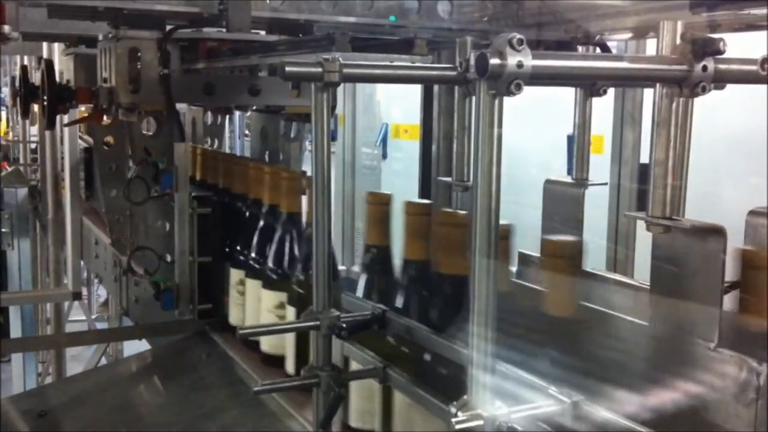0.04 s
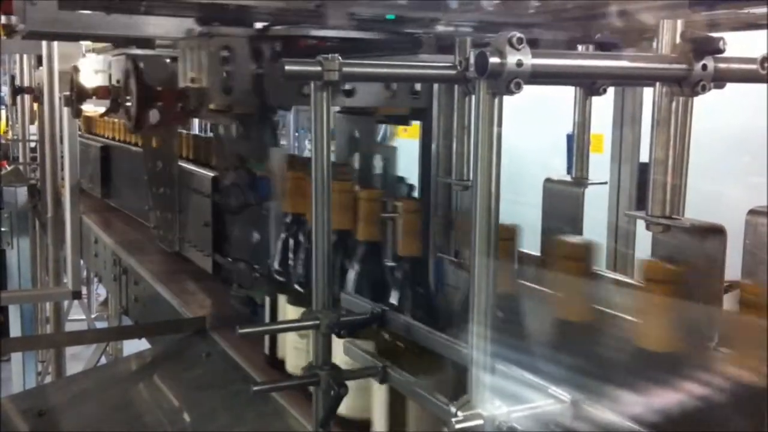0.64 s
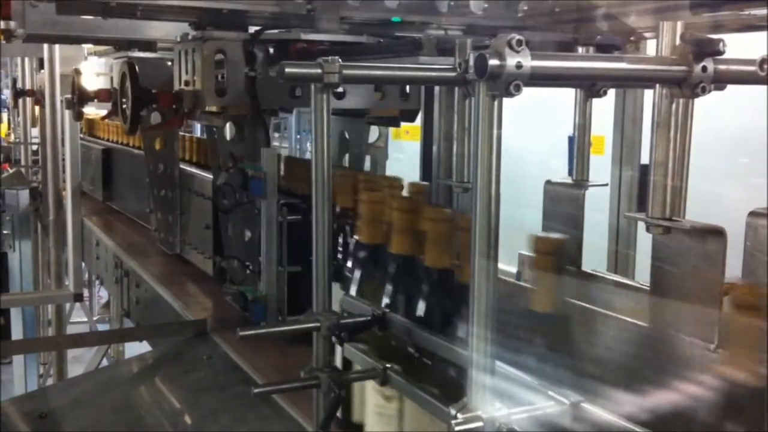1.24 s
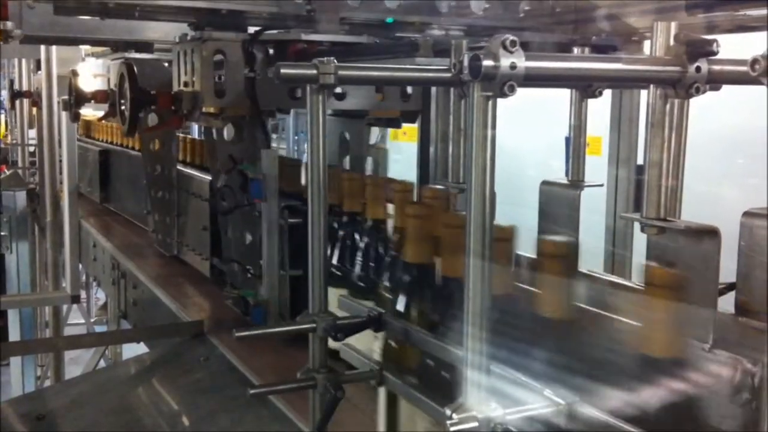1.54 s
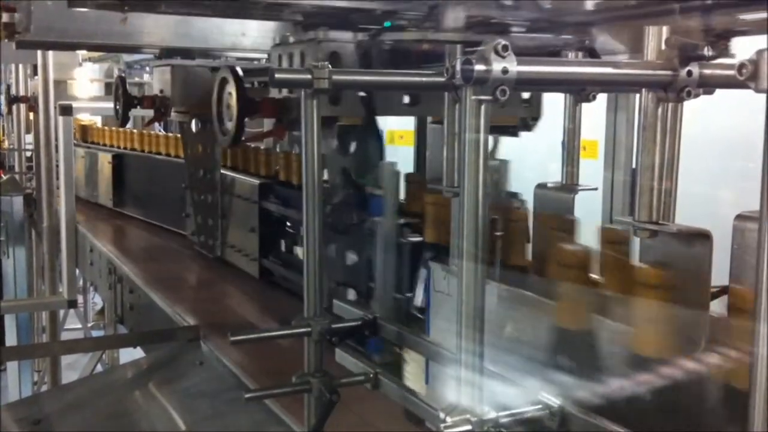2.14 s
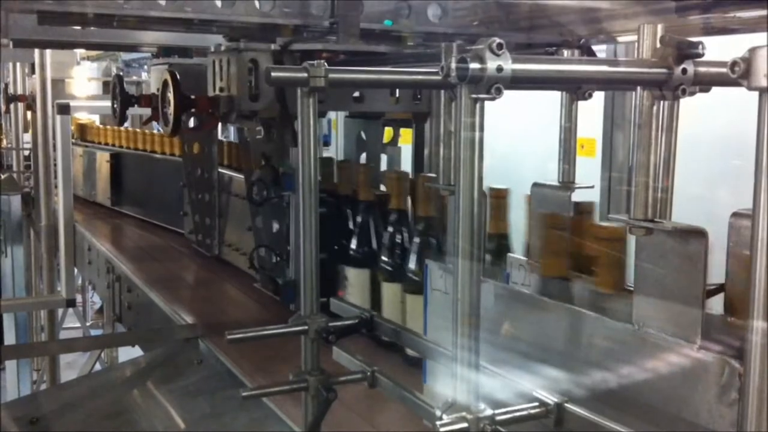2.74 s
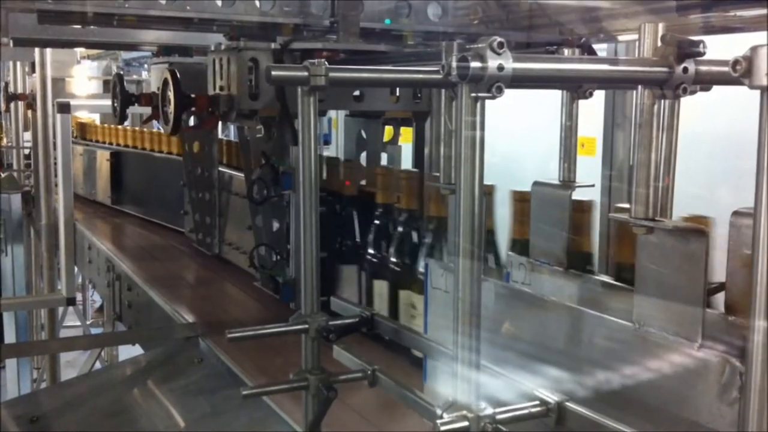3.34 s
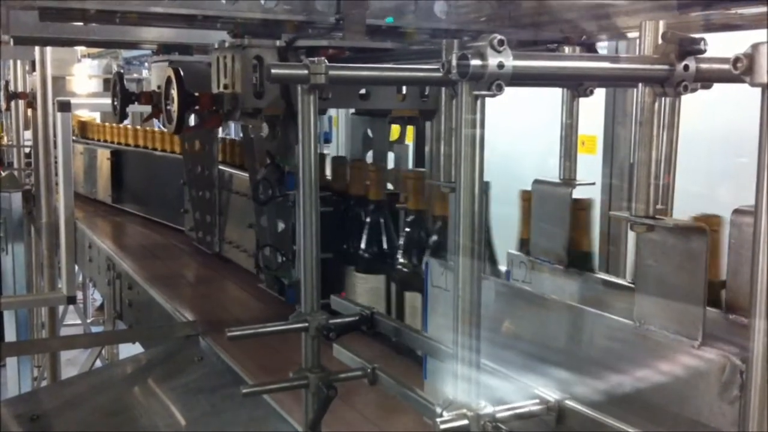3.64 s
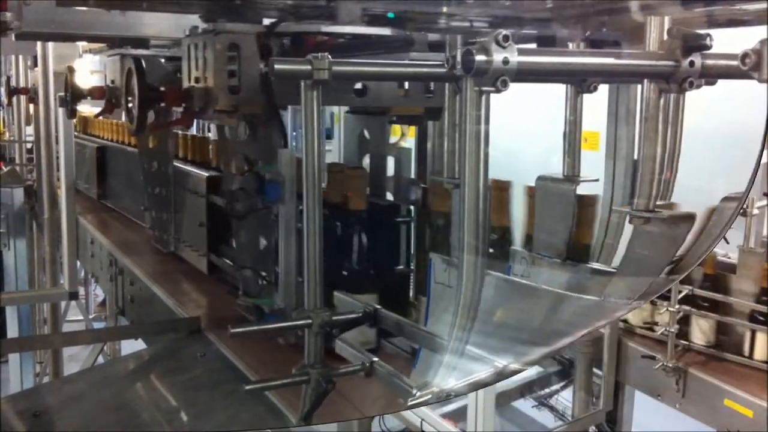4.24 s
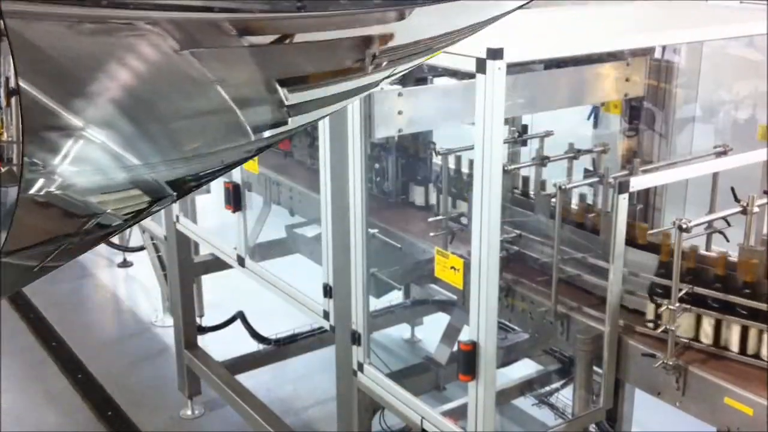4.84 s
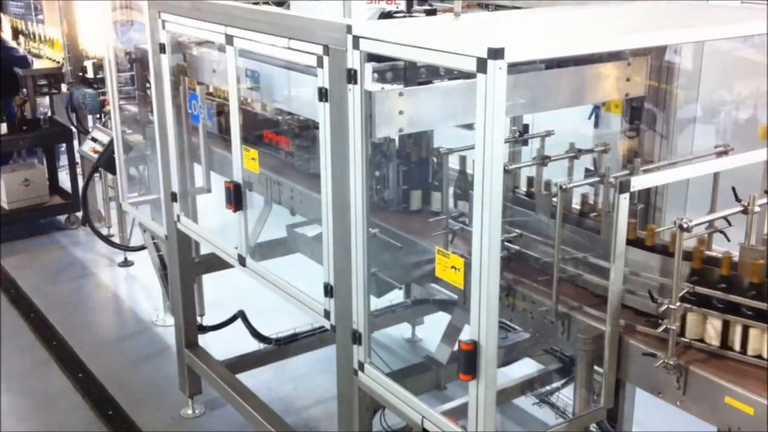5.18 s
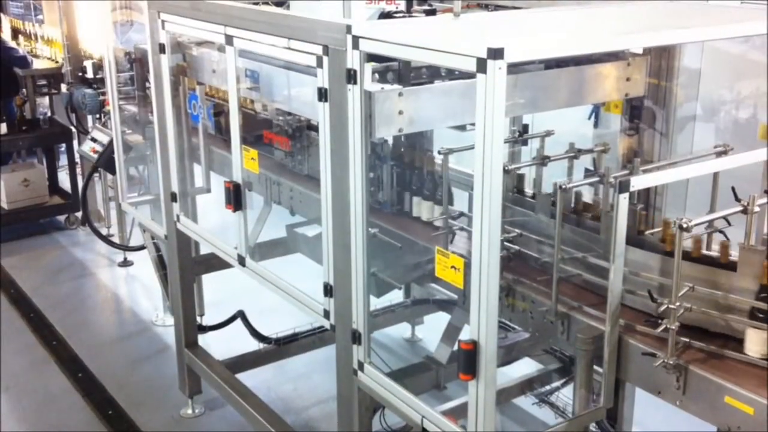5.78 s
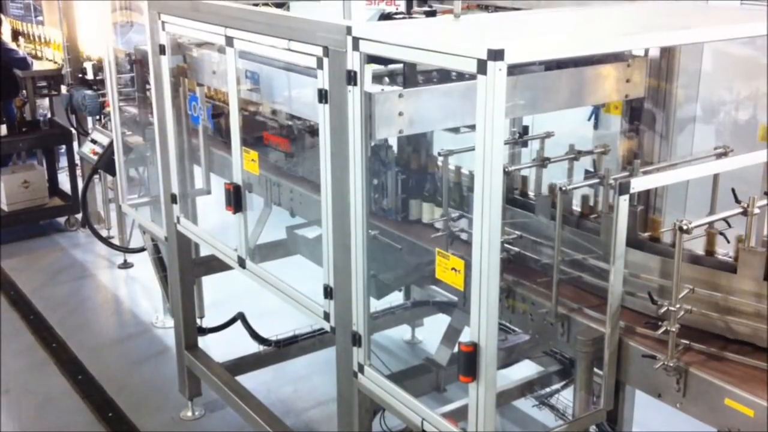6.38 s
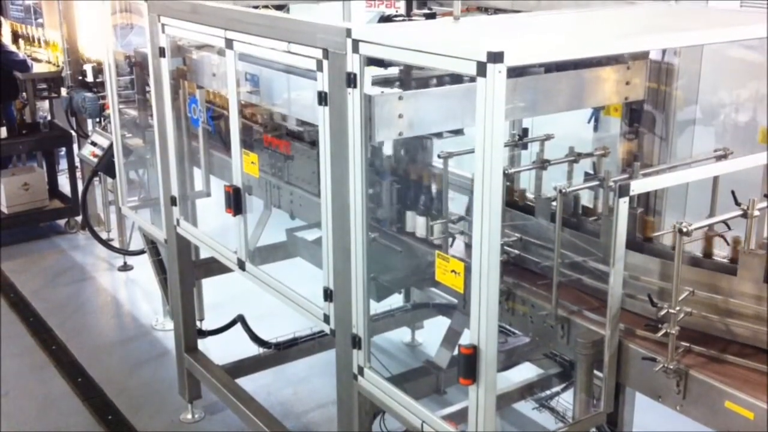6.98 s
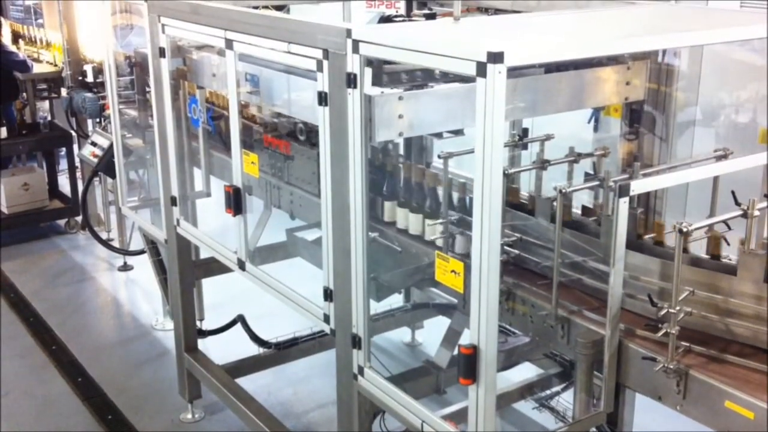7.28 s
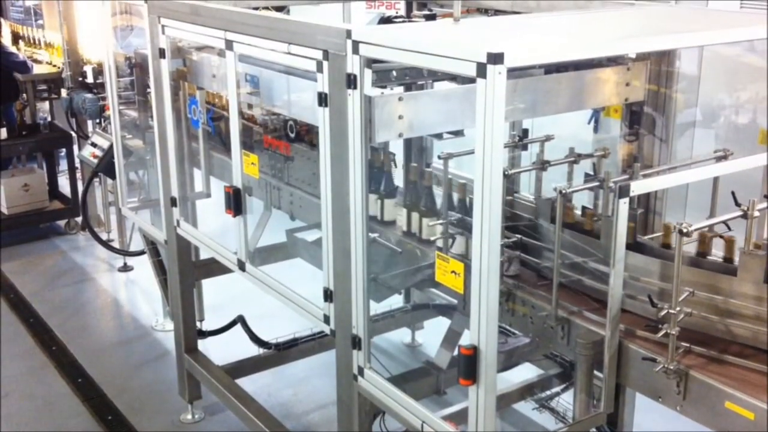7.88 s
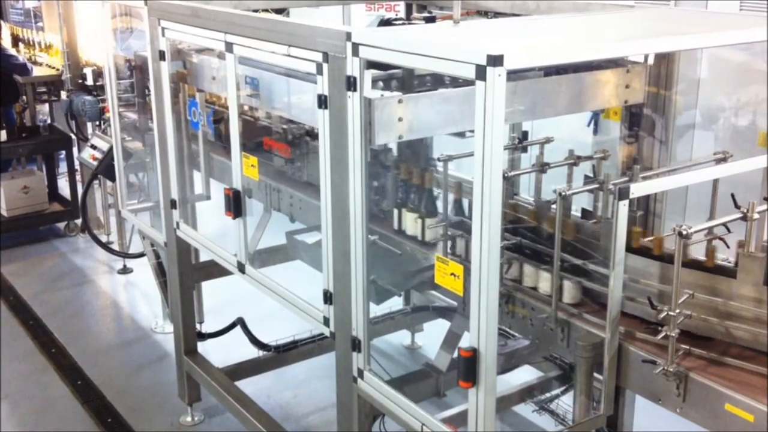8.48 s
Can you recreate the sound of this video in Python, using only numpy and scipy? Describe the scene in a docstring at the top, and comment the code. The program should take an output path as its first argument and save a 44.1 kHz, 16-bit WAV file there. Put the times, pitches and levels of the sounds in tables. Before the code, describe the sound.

A factory bottling line runs continuously in mono. At first the microphone is inside the machine guard, with a rattling conveyor roar, motor hum, lightly knocking glass bottles and whistling, hissing air, all gradually easing. The sound then switches abruptly to outside the machine, where the roar is fuller again and the whistle keeps flaring over it. A second, higher whistle and a faint thin whine appear, while bottles keep jostling.

```python
"""A bottling line in a factory hall, in mono. We start inside the guard of the bottle divider: conveyor
chains roar over humming motors, bottles jostle and knock, and compressed air hisses and whistles in
narrow resonances. Roar and air slowly recede. At 3.8 s a hard cut puts us beside the machine: the roar
is back up, the whistle holds and swells, and a higher whistle and thin motor controller tones join in.
The hiss creeps up to the end. Throughout, the loudest peaks are softly rounded."""
import sys
import numpy as np
from scipy import signal
from scipy.fft import rfft, irfft
from scipy.io import wavfile

SR = 44100
rng = np.random.default_rng(int(sys.argv[2]) if len(sys.argv) > 2 else 0)


def generate_wav(sig):
    """Save sig (samples, or channels by samples) to the path in sys.argv[1] as 16-bit PCM at SR."""
    pcm = np.round(np.clip(np.atleast_2d(sig).T, -1, 1) * 32767).astype(np.int16)
    wavfile.write(sys.argv[1], SR, pcm)


N = 380141
CUT_S = 3.808

# Tone of the machine frame's rumble. Each row: frequency in Hz, relative level in dB.
FRAME_SPECTRUM = [(35, -40), (60, -46), (90, -13.5), (125, -4.5), (185, 2.5), (250, 2), (320, -5.5),
                  (600, -30)]
# The frame rumbles harder for a while. Each row: centre in seconds, length in seconds, lift in dB.
FRAME_SHUDDERS = [(1.95, .4, 0.5), (2.95, 0.33, 4), (4.25, 0.32, 3), (7.5, 1.5, 2)]
# Tone of the finest air spray. Each row: frequency in Hz, relative level in dB.
SPRAY_SPECTRUM = [(8000, -11), (11500, 0), (13700, 1), (15700, -3)]
# Brief puffs of extra air. Each row: centre in seconds, length in seconds, lift in dB.
AIR_PUFFS = [(1.74, .25, 1.5), (3.95, 0.18, 1.3), (5.25, 0.17, 1.5), (6.26, .08, 3), (7.5, 0.11, 2.4),
             (7.82, 0.21, 1.2)]
# The main whistle briefly swells louder. Each row: centre in seconds, length in seconds, lift in dB.
WHISTLE_SWELLS = [(.15, .25, 2.5), (3.26, .12, 6), (4.24, .35, 3.5), (4.63, 0.05, 6), (5.85, 0.027, 4),
                  (6.43, 0.023, 9.5), (8.24, 0.032, 3.5)]


def undb(db):
    """Decibels to gain."""
    return 10 ** (np.asarray(db) / 20)


def unit(x):
    """Scale to rms 1."""
    return x / np.sqrt(np.mean(x ** 2))


def fader(points):
    """A gain ride through points of time in seconds and level in dB."""
    seconds, db = np.transpose(points)
    return undb(np.interp(np.arange(N) / SR, seconds, db))


def drift(rate):
    """Smooth random motion with rms 1, changing about rate times a second."""
    f = np.arange(N // 2 + 1) * SR / N
    return unit(irfft(rfft(rng.standard_normal(N)) / (1 + (f / rate) ** 4), N))


def waver(spread_db, rate):
    """Gain that wanders at random around 1."""
    return undb(spread_db * drift(rate))


def swells(table):
    """Gain with a bell-shaped lift for each row; the length is the width at half the lift in dB."""
    t = np.arange(N) / SR
    return undb(sum(db * .5 ** ((2 * (t - centre) / length) ** 2) for centre, length, db in table))


def equalise(x, spectrum):
    """Shape x with an EQ curve of points in Hz and dB, then scale to rms 1."""
    hz, db = np.transpose(spectrum)
    f = np.arange(1, N // 2 + 2) * SR / N
    return unit(irfft(rfft(x) * undb(np.interp(np.log(f), np.log(hz), db)), N))


def resonances(modes, skirt):
    """Noise rings narrow resonances; a second pole, skirt times wider, steepens their sides."""
    f = np.arange(1, N // 2 + 2) * SR / N
    out = 0
    for hz, width, db in modes:
        detune = (f - hz) / (width / 2)
        ring = irfft(rfft(rng.standard_normal(N)) / (1 + 1j * detune) / (1 + 1j * detune / skirt), N)
        out = out + undb(db) * unit(ring)
    return out


def controllers():
    """The motor controllers' thin switching tones, steady in pitch and drifting in level."""
    # Each row: frequency in Hz, level in dB.
    tones = [(5756, -47), (7228, -54), (8065, -56)]
    t = np.arange(N) / SR
    return sum(undb(db) * unit(np.sin(2 * np.pi * hz * t) * waver(2, rate=2)) for hz, db in tones)


def motors():
    """Motor and gear hum that wavers with the load: one mix for inside the guard, one for outside."""
    # Each row: frequency in Hz, level inside in dB relative to the roar, level outside in dB.
    drive_tones = [(118.8, -24.5, -48.5), (351, -17, -40), (790, -29, -41.5), (882, -30, -42)]
    inside, outside = 0, 0
    for hz, inside_db, outside_db in drive_tones:
        phase = 2 * np.pi * np.cumsum(hz * (1 + 0.00797 * drift(5.72))) / SR
        tone = unit(np.sin(phase) * waver(3.1, rate=8.2))
        inside += undb(inside_db) * tone
        outside += undb(outside_db) * tone
    return inside, outside


def bottles(jostle_db):
    """Bottles nudge each other all the time; a few knock harder against the guides."""
    # A full bottle on its steel guide. Each row: frequency in Hz, T60 in seconds, relative level in dB.
    modes = [(627.6, 0.26, -7.5), (726, .14, -15), (1110, 0.071, 0), (2790, 0.087, 4), (3640, 0.11, -25),
             (5320, .04, -13)]
    # Hard knocks in the divider. Each row: start in seconds, peak level in dB.
    knocks = [(.593, -20), (2.778, -22), (3.557, -24)]
    t = np.arange(SR // 4) / SR
    ring = sum(undb(db - 60 * t / t60) * np.sin(2 * np.pi * hz * t) for hz, t60, db in modes)
    # the ring carries no bass below 400 Hz
    ring = signal.sosfilt(signal.butter(2, 400, "high", fs=SR, output="sos"), ring)
    nudges = rng.random(N) < 14 / SR  # about 14 a second
    blows = undb(jostle_db) * nudges * rng.uniform(-1.1, 1, N)
    for start, db in knocks:
        blows[int(start * SR)] += undb(db)
    return signal.fftconvolve(blows, ring / np.abs(ring).max())[:N]


def clatter(per_second, spread_db):
    """Chain links strike at random, with uneven force."""
    hits = rng.random(N) < per_second / SR
    return unit(hits * rng.standard_normal(N) * undb(spread_db * rng.standard_normal(N)))


def conveyor(spectrum, rattle_db):
    """Near chain links rattle, smeared by the surrounding panels, over the wash of countless far ones."""
    t = np.arange(SR // 10) / SR
    panels = rng.standard_normal(len(t)) * undb(-60 * t / 0.041)  # T60 of 41 ms
    links = unit(signal.fftconvolve(clatter(per_second=500, spread_db=3.4), panels)[:N])
    return equalise(rng.standard_normal(N) + undb(rattle_db) * links, spectrum)


def air(spectrum, flutter_db):
    """The hiss of a turbulent jet whose strength flutters a little."""
    return equalise(rng.standard_normal(N), spectrum) * waver(flutter_db, rate=30)


def whistle(hz, width_hz, purity):
    """A jet locks onto a resonance: purity (0-1) is the share of wavering tone, the rest is breath."""
    pitch_hz = hz + 0.3996 * width_hz * drift(23.66)
    tone = unit(np.sin(2 * np.pi * np.cumsum(pitch_hz) / SR))
    breath = resonances([(hz, 1.47 * width_hz, 0)], skirt=2.8)
    return np.sqrt(purity) * tone + np.sqrt(1 - purity) * breath


def inside_guard(hum):
    """Close on the divider: chain roar, hollow bottles, bright air and the whistle, all receding."""
    # Tone of the chain roar and the air hiss. Each row: frequency in Hz, relative level in dB.
    roar_spectrum = [(100, -32), (280, -13), (380, -4), (560, -4.5), (760, -7), (920, -1.5), (1200, -2),
                     (1400, -4), (1650, -5), (2300, -12), (4000, -16.5), (8000, -28.5)]
    hiss_spectrum = [(1500, -22), (4000, -3.5), (6000, 1.5), (8000, 1), (10000, -0.5), (12200, -2),
                     (13000, -2), (15700, -22)]
    # Fader rides for the machinery and the fine spray. Each row: time in seconds, gain in dB.
    machine_ride = [(0.0, -21.5), (0.71, -22), (1.18, -25), (2.11, -25), (2.51, -28), (3.25, -29.5),
                    (3.37, -32), (3.76, -33)]
    spray_ride = [(0, -25.5), (1.0, -33.5), (2.14, -36), (2.65, -47), (3.0, -47), (3.6, -57)]
    # Hollow ring of passing bottles, and the weaker air resonances.
    # Each row: frequency in Hz, width in Hz, relative level in dB.
    hollow_modes = [(642, 35, -4.5), (762, 140, 1.5)]
    air_modes = [(2705, 62, -5.5), (2810, 110, -8), (3055, 64, -8.5), (3255, 89, -11), (3640, 91, -4),
                 (4450, 38, -16), (4700, 140, -13), (5385, 130, -11.5), (6660, 110, -16.5)]
    # Bottles crowd and ring louder. Each row: centre in seconds, length in seconds, lift in dB.
    crowding = [(.62, 0.15, 6), (1.02, 0.067, 5), (1.26, .05, 5)]

    roar = undb(1.92) * conveyor(roar_spectrum, rattle_db=-12.5)
    rumble = undb(-12.5) * conveyor(FRAME_SPECTRUM, rattle_db=-7)
    rumble *= waver(1.0, rate=13) * swells(FRAME_SHUDDERS)
    hollow = undb(-7.5) * resonances(hollow_modes, skirt=2.1)
    hollow *= waver(1.5, rate=8.6) * swells(crowding)
    machinery = fader(machine_ride) * (undb(0.5) * hum + roar + rumble + hollow)

    jet_gain = undb(-28.7 - 3.15 * np.arange(N) / SR) * swells(AIR_PUFFS)  # falls 3.15 dB a second
    main_whistle = undb(4.5) * whistle(hz=1803, width_hz=39.7, purity=0.47)
    main_whistle *= waver(1, rate=30) * swells(WHISTLE_SWELLS)
    rings = undb(2.5) * resonances(air_modes, skirt=6) * waver(1.35, rate=13)
    hiss = undb(0.3) * air(hiss_spectrum, flutter_db=0.57)
    spray = fader(spray_ride) * air(SPRAY_SPECTRUM, flutter_db=-1.3)
    return machinery + jet_gain * (main_whistle + rings + hiss) + spray


def beside_machine(hum):
    """Out in the hall: the whistle leads over roar and slowly growing hiss, with a softer top end."""
    # Tone of the chain roar and the air hiss. Each row: frequency in Hz, relative level in dB.
    roar_spectrum = [(100, -44), (280, -7.5), (440, -3), (700, -3), (950, 1), (1500, 0.5), (2100, 2),
                     (2400, -8.5), (4000, -9.5), (6200, -26.5), (8000, -39)]
    hiss_spectrum = [(2000, -17), (4000, 1), (5000, 10.5), (6400, 5), (7200, 0.5), (8300, -0.5), (9700, -6),
                     (10800, -4), (12500, -11.5), (15700, -30)]
    # Fader rides for the conveyor and the fine spray. Each row: time in seconds, gain in dB.
    conveyor_ride = [(3.83, -22.5), (4.35, -23), (4.88, -25.3), (5.02, -22.5), (5.35, -22.5), (5.8, -23),
                     (6.5, -24), (7.0, -22), (7.7, -22.5), (8.6, -22.8)]
    spray_ride = [(3.83, -44), (4.8, -52), (6.6, -55), (7.6, -44), (8.6, -36)]
    # Air resonances. Each row: frequency in Hz, width in Hz, level in dB relative to the hiss.
    air_modes = [(1785, 210, 2.5), (2703, 115, -1), (2860, 120, -5), (3265, 125, .5), (3682, 96, -3),
                 (4455, 60, -9.5), (4716, 120, -9.5), (5470, 180, -8.5), (6220, 260, -12.5)]
    # The upper whistle briefly swells louder. Each row: centre in seconds, length in seconds, lift in dB.
    upper_swells = [(3.98, .09, 5.5), (4.91, 0.059, 6), (5.11, 0.059, 6), (7.22, .08, 5)]

    roar = undb(4.0) * conveyor(roar_spectrum, rattle_db=-9.0) * waver(0.66, rate=11)
    rumble = undb(-11.5) * conveyor(FRAME_SPECTRUM, rattle_db=-11)
    rumble *= waver(0.9, rate=10) * swells(FRAME_SHUDDERS)
    main_whistle = undb(-14.0) * whistle(hz=1791, width_hz=43, purity=0.45)
    main_whistle *= waver(1.5, rate=38) * swells(WHISTLE_SWELLS)
    upper_whistle = undb(-23.5) * whistle(hz=3034, width_hz=48, purity=0.52)
    upper_whistle *= waver(2.5, rate=8.6) * swells(upper_swells)
    rings = resonances(air_modes, skirt=4.0)
    machinery = hum + controllers() + fader(conveyor_ride) * (roar + rumble)

    since_cut = np.arange(N) / SR - CUT_S
    jet_gain = undb(-27 + 0.4 * since_cut) * swells(AIR_PUFFS)  # rises 0.4 dB a second
    hiss = air(hiss_spectrum, flutter_db=0.6)
    spray = fader(spray_ride) * air(SPRAY_SPECTRUM, flutter_db=0.3)
    return machinery + main_whistle + upper_whistle + jet_gain * (rings + hiss) + spray


def scene():
    """Two perspectives joined by a hard cut, with the bottles jostling through both."""
    hum_inside, hum_outside = motors()
    before_cut = np.arange(N) / SR < CUT_S
    mono = np.where(before_cut, inside_guard(hum_inside), beside_machine(hum_outside))
    mono += bottles(jostle_db=-30.5)
    return np.array([mono, mono])


def record(dry):
    """Soft-clip the peaks near full scale, then trim the lows below 55 Hz and the top above 15.7 kHz."""
    rounded = dry / (1 + dry ** 8) ** (1 / 8)
    low_cut = signal.butter(2, 55, "high", fs=SR, output="sos")
    high_cut = signal.ellip(12, .1, 85, 15700, fs=SR, output="sos")
    return signal.sosfilt(high_cut, signal.sosfilt(low_cut, rounded))


dry = scene()
out = record(dry)
generate_wav(out)
```